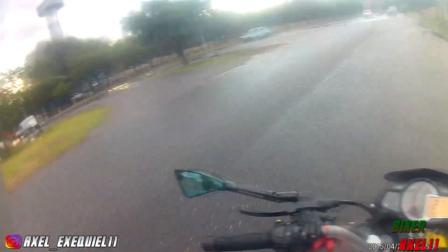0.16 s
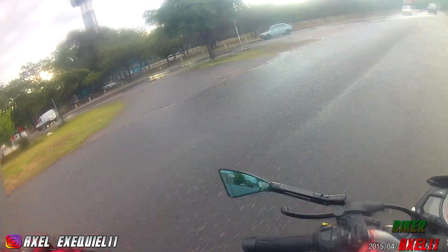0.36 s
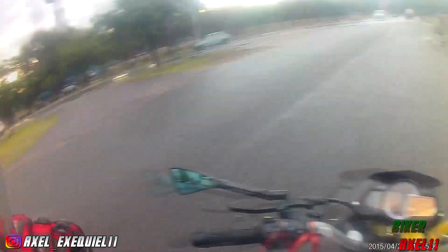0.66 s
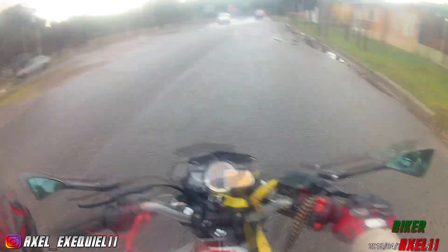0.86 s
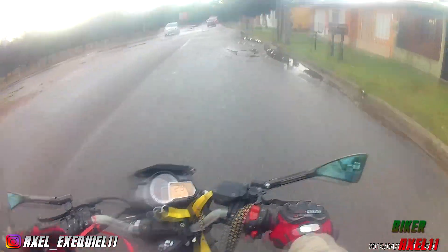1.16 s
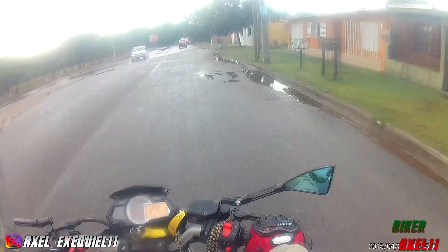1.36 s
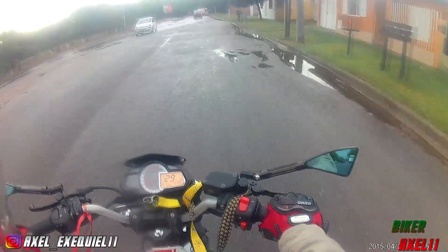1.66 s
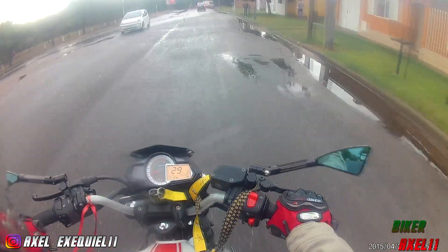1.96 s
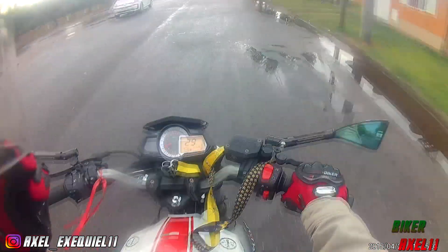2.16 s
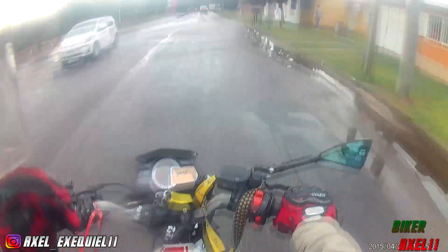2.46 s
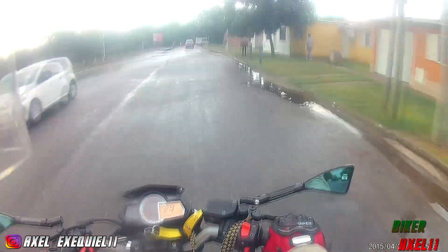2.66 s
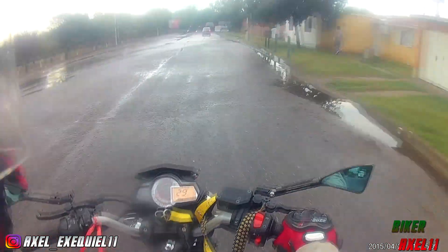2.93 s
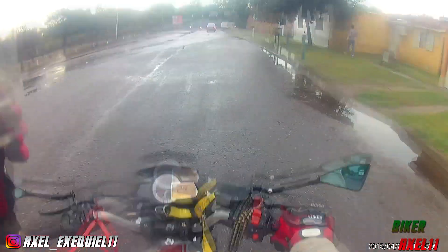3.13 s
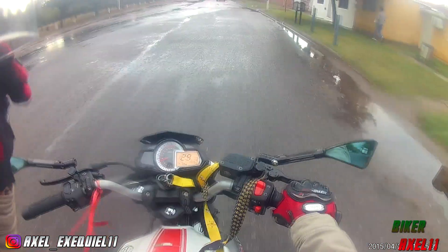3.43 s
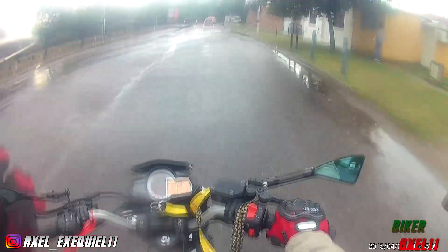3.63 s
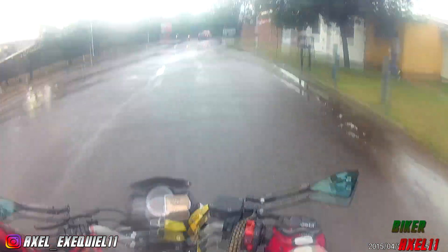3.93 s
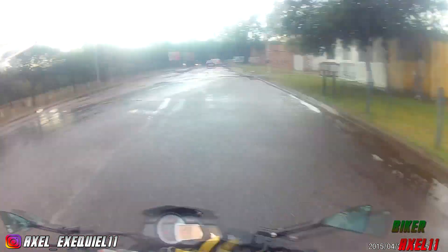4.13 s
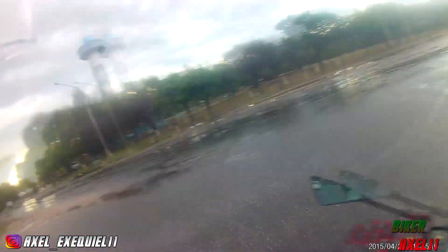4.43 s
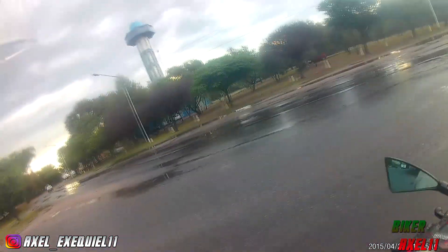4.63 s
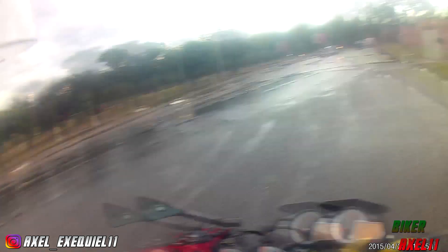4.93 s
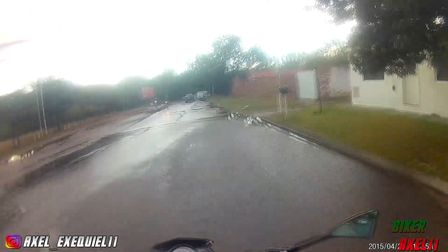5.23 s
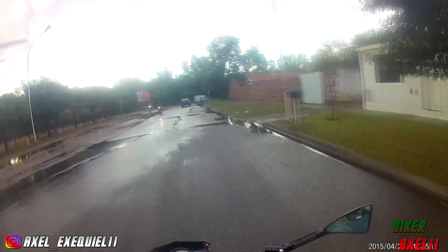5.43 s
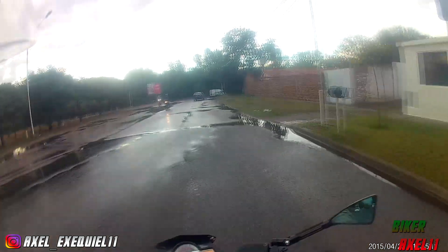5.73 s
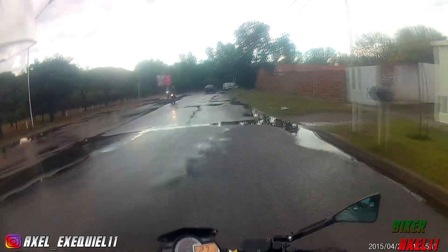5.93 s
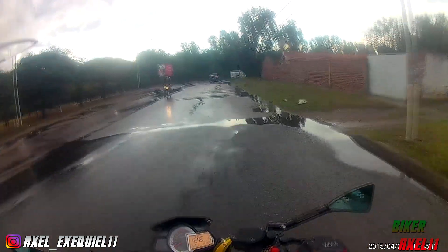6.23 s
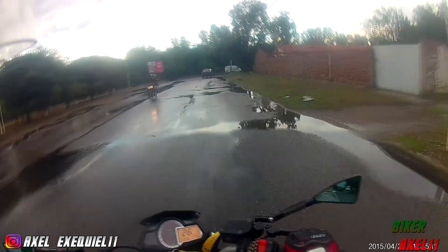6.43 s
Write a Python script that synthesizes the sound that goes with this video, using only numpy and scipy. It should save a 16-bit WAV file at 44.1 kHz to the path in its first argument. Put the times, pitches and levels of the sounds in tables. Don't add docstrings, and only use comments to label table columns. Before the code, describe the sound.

A motorcycle ride on a wet street heard through a closed case: low rumble and hiss, interrupted by sudden hollow thumps and rattles.

```python
import sys
import numpy as np
from scipy import signal
from scipy.fft import rfft, irfft
from scipy.io import wavfile
from scipy.ndimage import uniform_filter1d

SR = 44100
rng = np.random.default_rng(int(sys.argv[2]) if len(sys.argv) > 2 else 0)


def file_out(sig):
    cols = np.atleast_2d(sig).T
    lim = np.clip(cols, -1, 1)
    pcm = np.round(lim * 32767).astype(np.int16)
    wavfile.write(sys.argv[1], SR, pcm)


def boost_factor(decibels):
    exponent = np.asarray(decibels, float) / 20
    return 10 ** exponent


N = 290206

# start_s, boom_peak_db, boom_hz, sway_rel_db, bracket_rel_db
HARD_RAPS = [(.534, -31, 140.4, -10.5, -35), (.636, -22.5, 128, -18, -16.5), (.679, -23.5, 117.4, -16, -19),
             (1.639, -23.5, 137, -8.5, -8.5), (1.853, -34.5, 149, -19, -16),
             (2.047, -20.5, 116, -18.5, -9.5), (2.108, -9.5, 143.3, -18, -12),
             (2.374, -23.5, 184.5, -12.5, -14), (3.211, -8.5, 147, -17.5, -12.5),
             (3.254, -10.5, 132, -3, -4.5), (3.564, -34, 156, -18, -13), (4.36, -38, 124, -8, -32),
             (4.49, -31.5, 137, -13, -19)]
SOFT_THUDS = [(.403, -29, 96.7, -11, -39), (.846, -22.5, 141.8, -1, -12), (1.795, -34, 146, -3, -33),
              (1.979, -35.5, 138, -3, -27), (2.084, -23, 157.3, -7, -31), (2.197, -27.5, 136.3, -20, -15),
              (2.361, -24, 166, -16, -21), (3.052, -39, 149.7, 5, -4.5), (2.387, -36, 165, -15, 8),
              (3.47, -44.5, 153, -5, -14), (3.697, -19.5, 148.8, -4, -12.5), (3.734, -29.5, 103, 8.5, -33),
              (3.841, -36.5, 124.5, -22, -9), (3.917, -51.5, 142, 17.5, -15), (3.983, -32.5, 101, -13, -21)]
SLOW_SHOVES = [
    (.424, -33, 108.3, -1, -38),
    (.868, -28.5, 172.8, 3, -1.5),
    (2.149, -26.5, 124.2, 8.5, -24),
    (2.409, -20.5, 145.2, -11, -44),
    (3.086, -42.5, 113, -12, -26),
    (3.289, -26.5, 148.8, 5, -4),
    (4.422, -42.5, 120, 2, -24),
    (3.177, -27.5, 90, 2.5, -6),
    (2.47, -35, 147, -25, -30),
]
# pitch_ratio, level_db, t60_ratio
BOOM_PARTIALS = [(1, 3, 0.65), (.73, -3.5, 0.7), (1.33, -9, 0.35), (1.4, -12.5, 0.46), (1.8, -14, 0.22),
                 (0.495, 2, 0.28)]
# start_s, peak_db, pitch_hz,
# t60_s
CLIP_KNOCKS = [(.409, -39, 270, .05), (.667, -31, 300, .04), (.872, -29, 260, .05), (1.8, -38, 240, .05),
               (2.163, -36, 270, .05), (2.388, -30, 270, .05), (3.245, -20, 280, .05),
               (3.256, -18, 260, .05), (3.781, -43, 280, .05), (3.972, -47, 280, .05),
               (1.628, -38, 441, .1), (2.19, -37, 441, .07), (2.372, -35, 441, .1), (3.209, -22, 441, .08),
               (3.2165, -9, 131, .05), (2.197, -26, 190, .05), (.868, -36, 700, .05), (5.9, -54, 436, .15),
               (6.34, -56, 436, .15), (6.5, -54, 436, .15)]
# pitch_hz, width_hz, level_db
FOAM_MODES = [(217, 60, 3.5), (340, 190, -13.5), (580, 156, -9.5)]

# start_s, peak_db, struck_spot_hz, panel_rel_db, edge_rel_db
SNAPS = [(0.4093, -42, 1250, -20, -3), (0.649, -14, 1500, -28, -30), (0.6512, -17, 1900, -24, -22),
         (0.6675, -22, 1800, -5, -6), (.6814, -35, 1360, -12, -30), (3.256, -8, 1564, -8.5, -29),
         (1.6302, -31, 1110, -8, -37), (2.1078, -21.5, 1900, 1, -18.5), (2.1644, -42, 1140, 7, -15),
         (2.1953, -25, 1150, -1, -30), (3.2123, -13, 1600, -6, -20), (3.2692, -12, 1400, -8, -12),
         (3.2778, -17, 1800, -9, -18), (3.2828, -24, 1950, -4, -14), (3.2515, -17, 1200, -12, -20),
         (3.262, -16, 1100, -6, -20), (3.557, -35, 1440, -19, -35), (3.6972, -23.5, 1533, -13, -18),
         (3.7185, -31, 1700, 4, -16), (3.7297, -27, 1750, -25, -21), (2.3754, -31.5, 1600, 2, -24),
         (2.0472, -24, 1920, -17, -33), (3.2718, -16, 1800, -10, -12), (3.2215, -22, 1300, 3, -20)]
SCRAPES = [(0.3949, -30, 1800, -33, -18), (0.6945, -39, 1160, -4, -16), (1.6453, -30, 1460, -34, -21),
           (1.7998, -35.5, 1290, -15, -27), (2.0228, -40, 1730, 7.5, -28), (2.078, -33.5, 1170, 1.5, -11),
           (2.1244, -27, 1050, -2.5, -29), (2.3614, -46, 1225, 8, -26), (2.3894, -38.5, 1310, -3, -25),
           (3.0355, -43.5, 1380, -5, -19), (3.1835, -36, 1350, 2.5, -23), (3.2274, -26, 1580, 7, -15),
           (3.246, -24, 1490, -10, -16), (.868, -29, 1500, -2, -34), (0.848, -36, 1420, -19, -32),
           (2.372, -35, 1650, 6, -23), (3.782, -37.5, 1390, -4.5, -18), (3.948, -44.5, 1670, -27, -7.5),
           (3.973, -47.5, 1680, -20, -2.5), (3.217, -36, 1200, 5, -3), (3.259, -30, 1100, 5, -3),
           (3.275, -32, 1100, 8, -4), (2.092, -42, 1500, 0, -8), (3.703, -41, 1700, 0, -10),
           (3.19, -36, 1400, 4, -20)]
# pitch_hz, width_hz, level_db
SHELL_MODES = [(1230, 590, -2.5), (1660, 384, -2.5), (1920, 233, -1)]
PANEL_MODES = [(576, 340, 7), (732, 120, 23.5), (885, 62, -23)]
EDGE_MODES = [(2650, 700, 22), (3600, 700, 23), (4700, 600, 17)]

# start_s, peak_db, body_rel_db
LATCH_TICKS = [(2.1321, -37, 14), (2.164, -51.5, 15), (2.1938, -43, 20), (2.2215, -36.5, 21),
               (2.2494, -39, 20.5), (2.275, -52, 18), (3.2149, -46.5, 32.5), (3.237, -36.5, 7.5),
               (3.248, -46, 0), (3.261, -34, 5), (3.2695, -43, 15), (3.2854, -34, 12), (3.3004, -56, -2),
               (3.3103, -32, 19), (3.3367, -35.5, 21), (3.3648, -40.5, 18.5), (3.415, -45, 19.5),
               (3.71, -50.5, 7), (3.723, -52, 5), (3.7558, -49.5, 17)]
# delay_s, level_db
BOUNCES = [
    (0, 7.5),
    (.0018, -3),
    (.0045, -8),
]
# pitch_hz, level_db, t60_s
LATCH_BODY = [(1530, -10, 0.03), (1720, -9, .012), (1950, -5, .01), (2270, -7, 0.011), (2490, 0, 0.0045),
              (3050, -9, .005)]
LATCH_THIN = [(3200, -13, 0.0048), (4110, -1, 0.0056), (4600, 3.5, 0.0072), (5170, 3.5, 0.0078),
              (5820, -6, 0.009), (6380, -9, 0.0093), (9870, -6, 0.0062), (11200, -24, .005),
              (12500, -11.5, .005), (14100, -13.5, .005), (15200, -17, .005)]

# time_s, firings_so_far
FIRINGS = [(-.03, -1), (.582, 21), (1.288, 47), (2.6, 95.4), (3.6, 131.6), (4.3, 156.4), (4.927, 178),
           (5.434, 195), (6.005, 214), (6.61, 234)]
# time_s, level_db
THROTTLE = [(0, -2.5), (.4, -4.5), (.9, 2.5), (1.4, -1.5), (2.6, -2), (3.1, -0.5), (3.6, -6), (4.3, -7),
            (4.93, -5.5), (5.1, -9), (5.9, -7.5), (6.1, -16), (6.58, -15)]
# multiple_of_firing_rate, level_db
LOW_ORDERS = [(4, 3.5), (6, -4.5), (8, 0.5), (11, -15), (16, -13)]
# pitch_hz, level_db
RASP_COLOUR = [(250, -8.5), (600, -1.5), (800, -4), (1330, -2.5), (1550, -14), (1750, -1.5), (2050, -9.5),
               (2300, -11)]
# pitch_hz, width_hz, level_db
VALVE_MODES = [(3950, 130, 9.5), (4160, 110, 9), (4400, 140, 7.5)]
# start_s, length_s, tick_db
CLEAR_PATHS = [
    (-.3, .62, -69),
    (.3, .14, -73),
    (.5, .42, -69),
    (.9, .12, -72),
]
# start_s, peak_db
LONE_TICKS = [(4.9262, -58), (4.9601, -57), (4.9861, -57), (5.0155, -61), (5.0444, -53), (5.4331, -60),
              (5.6436, -61), (5.7339, -56), (5.8526, -63), (5.9434, -58), (6.0043, -57), (6.0337, -61),
              (6.095, -58), (6.125, -58), (6.1559, -59), (6.1853, -60), (6.2153, -59), (6.2467, -59),
              (6.3076, -59), (6.3684, -58), (6.3974, -59), (6.4268, -58), (6.4887, -59), (6.5181, -59)]
# multiple_of_firing_rate, start_s, length_s, level_db
GEARS = [(32, -.2, .8, -66), (32, 1.4, 1, -67), (32, 3.9, 1.6, -65), (32, 5.1, 2, -67), (24, 5.6, 1.4, -67),
         (25, .7, 1.1, -67), (18, 4.5, .7, -69), (11, 0, 1.1, -66), (40, 4.3, 1, -69), (22, 5.3, .7, -65)]

# time_s, level_over_calm_db
WIND = [(0, 2), (.2, 7.5), (.5, 9.5), (1.1, 0.5), (1.45, -2.5), (1.8, 4.5), (2.3, 4), (2.8, 1), (3.6, 2.5),
        (3.9, 2.5), (4.2, 3), (4.5, 6), (4.75, 0.5), (4.97, 8.5), (5.3, -3.5), (5.6, -2.5), (6.2, 1),
        (6.58, -0.5)]
# pitch_hz, width_hz, level_db
ROCKING_MODES = [(23.3, 23, -5), (35.5, 9.9, -4), (44.7, 7.4, -1.5), (67, 20, -14)]
DRUMMING_MODES = [(101, 19, 0), (148.8, 19, -1), (199, 82, -13)]
# pitch_hz, level_db
SPRAY_COLOUR = [(180, 0.5), (360, 0), (950, -10), (1150, -3), (1500, -9.5), (2050, -8.5), (2350, -16.5),
                (2900, -35.5)]
FIZZ_COLOUR = [(1800, -15.5), (2400, -3.5), (3300, -5), (4300, -2), (5000, -7.5), (6500, -22.5),
               (7800, -25), (9000, -43)]
# pitch_hz, width_hz, level_over_spray_db
CASE_PEAKS = [(432.4, 48, 12), (755, 300, 6), (1341, 273, 10), (1730, 520, 12)]
# start_s, length_s, level_over_spray_db
WIPES = [
    (.45, 0.3, 2.5),
    (1.98, 0.27, 8),
    (3.14, 0.16, 10.5),
    (3.69, 0.22, 3),
    (3.92, 0.086, -1),
]
# start_s, length_s, level_db
HEAD_TURNS = [
    (-.15, 1.16, -52.5),
    (4.2, 1.02, -54.5),
]
# pitch_hz, width_hz, level_db
VISOR_TONES = [(1130, 30, -12), (1290, 66, -2.5), (1360, 35, -4.5), (1440, 20, -1.5), (1680, 28, -4),
               (1840, 19, -7.5), (2000, 75, -6.5), (4400, 450, -18)]
# pitch_hz, level_db_per_hz
HISS_COLOUR = [(3240, -31), (5500, -5.5), (6900, -5), (7890, -12.5), (9150, -8), (12400, -7), (13600, -12),
               (15600, -10)]
# pitch_hz, rms_db
ELECTRONICS = [(12947, -101), (13028, -93), (13108, -109.5)]


def knocks():
    out, t = np.zeros(N), np.arange(SR // 2) / SR
    sway = ring(t, 43, t60=0.46, rise=0.0055)
    bracket = ring(t, 441, t60=0.14, rise=0.0088)
    fade = np.cos(np.pi * t)
    onset = 1 - np.exp(-t / .0025)
    for s, db, hz, sway_db, bracket_db, (t60, rise) in blows():
        boom = sum(boost_factor(d) * ring(t, hz * ratio, t60 * t60_ratio, rise) for ratio, d, t60_ratio in BOOM_PARTIALS)
        motion = onset * boom + boost_factor(sway_db) * sway + boost_factor(bracket_db) * bracket
        add(out, s, -boost_factor(db + 6.2) * fade * motion)
    for s, db, hz, t60 in CLIP_KNOCKS:
        add(out, s, -boost_factor(db + 4) * ring(t[:6000], hz, t60, .003))
    return out


def blows():
    kinds = (HARD_RAPS, (0.17, .005)), (SOFT_THUDS, (0.31, .006)), (SLOW_SHOVES, (0.44, .012))  # (t60 s, rise s)
    return [(*row, decay) for rows, decay in kinds for row in rows]


def cracks():
    out, t = np.zeros(N), np.arange(4096) / SR
    snap_force, scrape_force = (0.019, 0.0008, 19), (0.06, 0.0022, 11)  # (t60 s, rise s, click dB)
    rows = [(*row, *snap_force) for row in SNAPS] + [(*row, *scrape_force) for row in SCRAPES]
    for s, db, hz, panel_db, edge_db, t60, rise, click_db in rows:
        scrape, grit = rng.standard_normal((2, len(t)))
        onset = 1 - np.exp(-t / rise)
        force = scrape * boost_factor(3.7 * grit - 60 * t / t60) * onset
        force[30] -= boost_factor(click_db)
        struck_spot = (hz, 170, 8)
        crack = 0
        for modes, part_db in (([*SHELL_MODES, struck_spot], 0), (PANEL_MODES, panel_db), (EDGE_MODES, edge_db - .8)):
            part = onset ** 2 * resonate(force, modes)
            crack = crack + boost_factor(part_db) * part / abs(part).max()
        add(out, s, boost_factor(db - 1) * crack)
    return signal.sosfilt(signal.butter(4, 4600, fs=SR, output="sos"), out)


def latch():
    out, t = np.zeros(N), np.arange(2048) / SR
    body = sum(boost_factor(d) * ring(t, hz, t60, 0.00094) for hz, d, t60 in LATCH_BODY)
    for s, db, body_db in LATCH_TICKS:
        for delay, bounce_db in BOUNCES:
            late, *spread = rng.standard_normal(len(LATCH_THIN) + 1)
            thin = sum(boost_factor(d + 0.73 * e) * ring(t, hz * (1 + 0.0076 * e), t60, .0001)
                       for (hz, d, t60), e in zip(LATCH_THIN, spread))
            strike = boost_factor(db + bounce_db - 10.5) * (thin + boost_factor(body_db) * body)
            add(out, s + delay * (1 + 0.28 * late), strike)
    return out


def padding():
    out, t = np.zeros(N), np.arange(3000) / SR
    t60, rise = 0.085, 0.0051
    for s, db, *_ in blows():
        puff = evened(resonate(rng.standard_normal(len(t)), FOAM_MODES))
        add(out, s, boost_factor(db - 9 - 60 * t / t60) * (1 - np.exp(-t / rise)) * puff)
    return out


def engine():
    count = curve(FIRINGS)
    turns = count[0] + np.cumsum(uniform_filter1d(np.gradient(count), size=6000))
    throttle_db = curve(THROTTLE)
    hum = sum(boost_factor(db) * np.sqrt(2) * np.sin(2 * np.pi * k * turns) for k, db in LOW_ORDERS)
    whine = sum(humps([row], .5) * np.sqrt(2) * np.sin(2 * np.pi * k * turns) for k, *row in GEARS)
    exhaust = boost_factor(-60 + throttle_db) * hum + boost_factor(-57.5 + 0.1 * throttle_db) * rasp(turns)
    return whine + valves(turns) + exhaust


def valves(turns):
    firing = np.floor(turns).astype(int)
    strength = boost_factor(1.8 * rng.standard_normal(400))[firing]
    since = turns % 1
    seat = np.diff(np.floor(turns - .03), prepend=0) > 0
    leak = since / .06 * np.exp(-since / .06) * rng.standard_normal(N)
    ticks = evened(resonate(strength * (boost_factor(18.5) * seat + leak), VALVE_MODES))
    lone = np.zeros(400)
    for s, db in LONE_TICKS:
        lone[round(turns[round(s * SR)] - .1)] = boost_factor(db - 14.5)
    heard = boost_factor(-82) + humps(CLEAR_PATHS, 0.83) + lone[firing] / strength
    return heard * ticks


def rasp(turns):
    coarse, orders = turns[::8], np.arange(7, 66)
    at = np.arange(len(coarse))
    steps = at[::32]
    waver = evened(uniform_filter1d(rng.standard_normal((len(steps), len(orders), 2)), size=70, axis=0))
    colour = np.interp(orders * 35, *np.transpose(RASP_COLOUR))
    comb = np.zeros(len(coarse))
    for i, (k, db) in enumerate(zip(orders, colour)):
        level = np.interp(at, steps, boost_factor(db + 4.2 * waver[:, i, 0]))
        phase = np.interp(at, steps, 2 * waver[:, i, 1])
        comb += level * np.sin(2 * np.pi * k * coarse + phase)
    return evened(signal.resample_poly(comb, 8, 1)[:N])


def ride():
    wind = curve(WIND)
    lumps = boost_factor(2 * evened(uniform_filter1d(rng.standard_normal(N), size=2000)))
    rocking = evened(resonate(rng.standard_normal(N), ROCKING_MODES))
    drumming = evened(resonate(lumps * rng.standard_normal(N), DRUMMING_MODES))
    spray = wash(SPRAY_COLOUR, CASE_PEAKS, patchy_db=1.25, flicker_db=0.65)
    fizz = wash(FIZZ_COLOUR, patchy_db=1.2, flicker_db=0.8)
    wipe = humps(WIPES, 0.76)
    fizz_sag_db = -0.6 * (np.arange(N) / SR - 4)
    out = rocking * np.hypot(boost_factor(-53 + .6 * wind), shaken(-24.5, t60=1))
    out += drumming * np.hypot(boost_factor(-54 + .9 * wind), shaken(-15.5, t60=0.11))
    out += spray * boost_factor(-52.5 + 0.073 * wind) * np.hypot(1, wipe)
    out += fizz * boost_factor(-69 + 0.075 * wind + fizz_sag_db) * np.hypot(1, boost_factor(-3.5) * wipe)
    return out


def shaken(db, t60):
    kicks = np.zeros(N)
    for s, boom_db, *_ in blows():
        add(kicks, s + 0.01, boost_factor([boom_db + db]))
    return uniform_filter1d(signal.lfilter([1], [1, -boost_factor(-60 / (t60 * SR))], kicks), size=1500)


def visor():
    t, out = np.arange(N) / SR, np.zeros(N)
    first, second = HEAD_TURNS[0][0], HEAD_TURNS[1][0]
    since = t - np.where(t < second, first, second)
    glide = np.cumsum(np.maximum(1.03 - .06 * since, .9)) / SR
    for hz, width, db in VISOR_TONES:
        keep = np.exp(-np.pi * width / SR)
        a, b = signal.lfilter([1], [1, -2 * keep, keep ** 2], rng.standard_normal((2, N)))
        phase = 2 * np.pi * hz * glide
        out += boost_factor(db) * evened(a * np.cos(phase) + b * np.sin(phase))
    return humps(HEAD_TURNS, 1.3) * evened(out)


def wash(colour_table, peaks=(), patchy_db=1.5, flicker_db=1.):
    frames = N // 128 + 5
    a, b, patches = rng.standard_normal((3, 257, frames))
    patches = evened(uniform_filter1d(uniform_filter1d(patches, size=5, axis=0), size=20, axis=1))
    flicker = evened(uniform_filter1d(rng.standard_normal(frames), size=4))
    spectra = (a + 1j * b) * boost_factor(patchy_db * patches + flicker_db * flicker)
    x = signal.istft(spectra, nperseg=512, noverlap=384)[1][:N]
    f = np.fft.rfftfreq(N, 1 / SR)
    at, level = np.transpose(colour_table)
    colour = np.interp(np.log(f + 1), np.log(at), level, left=-90, right=-90)
    for hz, width, db in peaks:
        colour += db / (1 + (2 * (f - hz) / width) ** 2)
    return evened(irfft(rfft(x) * boost_factor(colour), N))


def resonate(x, modes):
    out = np.zeros(len(x))
    for k, (hz, width, db) in enumerate(modes):
        b, a = signal.iirpeak(hz, hz / (1.73 * width), SR)
        out += (-1) ** k * boost_factor(db) * signal.lfilter(b, a, signal.lfilter(b, a, x))
    return out


def ring(t, hz, t60, rise):
    return (1 - np.exp(-t / rise)) * boost_factor(-60 * t / t60) * np.sin(2 * np.pi * hz * t)


def humps(rows, power):
    t = np.arange(N) / SR
    return sum(boost_factor(db) * np.sin(np.pi * np.clip((t - s) / length, 0, 1)) ** power for s, length, db in rows)


def curve(table):
    return np.interp(np.arange(N) / SR, *np.transpose(table))


def evened(x):
    return x / np.sqrt(np.mean(x ** 2) + 1e-20)


def add(mix, s, sound):
    part = mix[round(s * SR):][:len(sound)]
    part += sound[:len(part)]


def scene():
    mix = knocks() + cracks() + latch() + padding() + engine() + ride() + visor()
    b, a = signal.iirnotch(8100, 8100 / 4400, SR)
    return signal.lfilter(b, a, mix)[None]


def top_cut(x):
    return signal.sosfilt(signal.butter(12, 15710, fs=SR, output="sos"), x)


def record(dry):
    t = np.arange(N) / SR
    whine = sum(boost_factor(db) * np.sqrt(2) * np.sin(2 * np.pi * hz * t) for hz, db in ELECTRONICS)
    hiss = boost_factor(-77.5) * wash(HISS_COLOUR, patchy_db=0.5, flicker_db=0.65)
    dry = signal.sosfilt(signal.butter(2, 24.3, "high", fs=SR, output="sos"), dry)
    return top_cut(dry + hiss + whine)


dry = scene()
out = record(dry)
file_out(out)
```